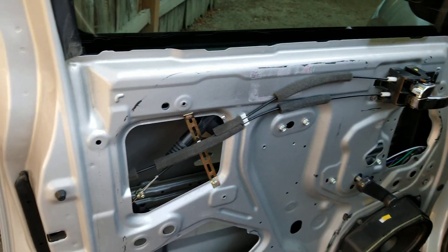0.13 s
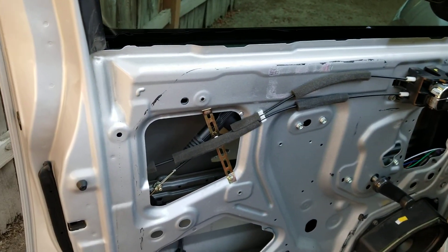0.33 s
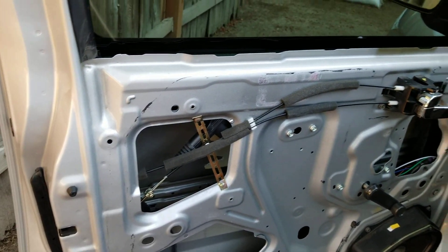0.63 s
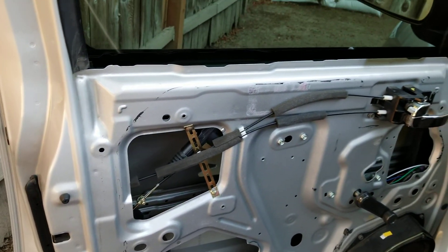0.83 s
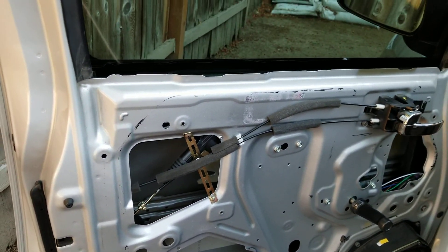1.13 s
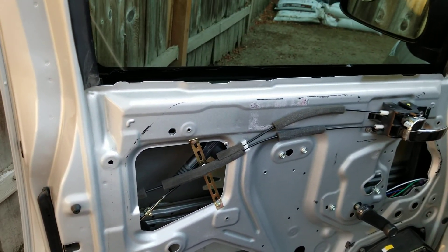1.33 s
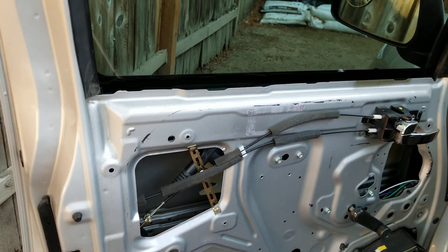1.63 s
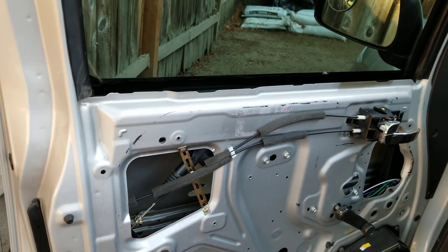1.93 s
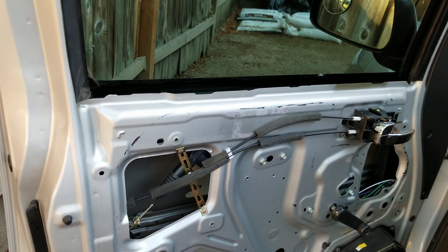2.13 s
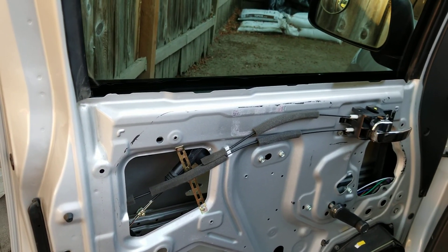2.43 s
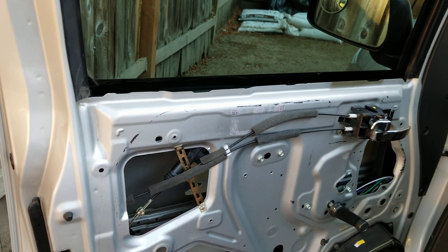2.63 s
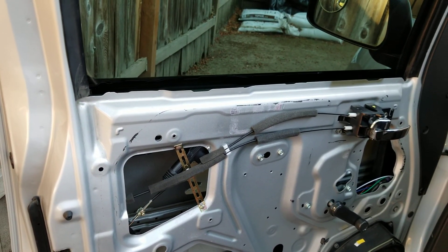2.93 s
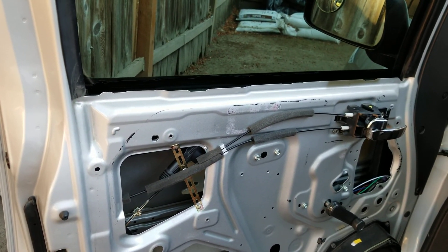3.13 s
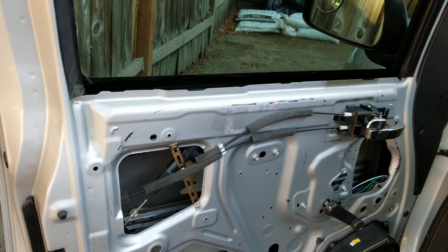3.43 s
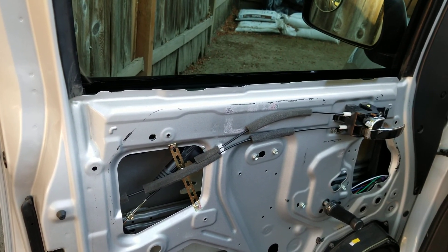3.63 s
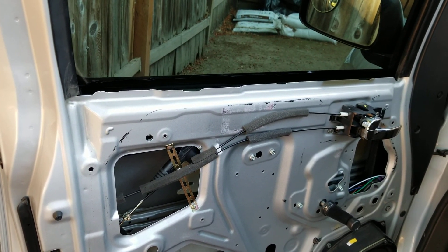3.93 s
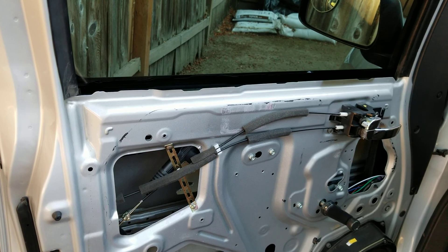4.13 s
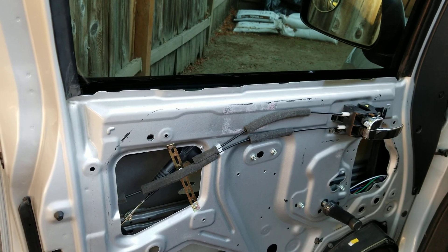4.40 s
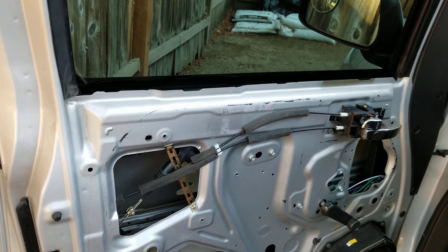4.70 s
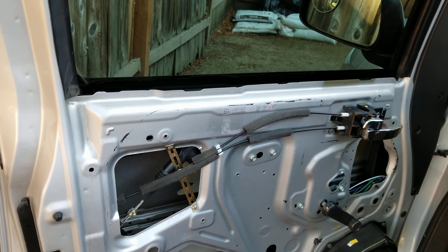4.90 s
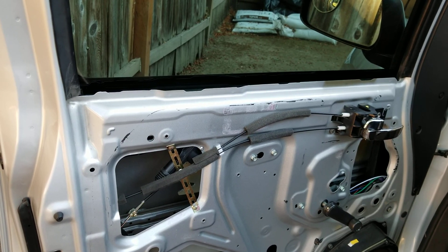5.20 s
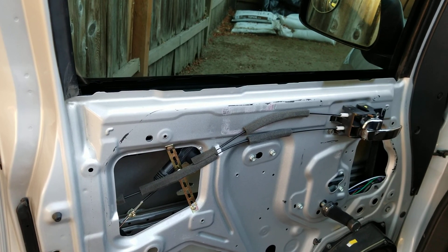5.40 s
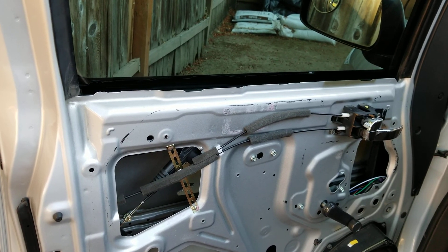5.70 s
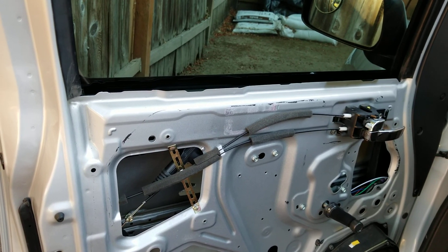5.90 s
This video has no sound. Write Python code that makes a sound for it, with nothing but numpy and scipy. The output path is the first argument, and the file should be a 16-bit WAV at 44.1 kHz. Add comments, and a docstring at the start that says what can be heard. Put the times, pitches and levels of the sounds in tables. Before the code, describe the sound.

A power lock actuator works at close range, louder toward the left. First press: tick, weak crunch, soft rubbing and knocks. Then lock, unlock, lock, unlock: sharp tick, a very short gear rattle, loud clack with booming sheet metal, and a much softer return click under half a second later. Distant rumble recedes; a hoarse far bird and thin whistles sound outside.

```python
"""A power lock works the latch of a stripped car door in an open garage; distant traffic, drone, birds, hiss.
First press: switch tick, a short crunch as the motor snatches at a closed stop, a rub and dull knocks.
Then lock and unlock: tick, gear teeth knock faster, the lever slams its stop, door modes boom; after each
powered spell a spring winds the gears back with a fainter clack. After the first unlock, a hoarse far bird;
then lock and unlock again. Contacts are decaying noise bands plus sine modes; traffic is fading noise."""
import sys
import numpy as np
from scipy import signal
from scipy.fft import rfft, irfft, next_fast_len
from scipy.io import wavfile
from scipy.ndimage import uniform_filter1d

SR = 44100
rng = np.random.default_rng(int(sys.argv[2]) if len(sys.argv) > 2 else 0)


def dump_mix(stems):
    """Bounce the given channels to the path in sys.argv[1] as a 16-bit WAV at rate SR."""
    frames = np.atleast_2d(stems).T  # one column per channel
    limited = np.clip(frames, -1, 1)  # hard clip at full scale
    pcm = np.round(limited * 32767).astype(np.int16)
    wavfile.write(sys.argv[1], SR, pcm)


N = 266893
TIME_S = np.arange(N) / SR
AGE_S = TIME_S[:SR]

# presses of the lock switch: t/s, wait until motor starts/s, snap level/dB, action of the lever
PRESSES = [(1.1229, .1446, -26.5, "stall"), (2.203, .1452, -22.5, "lock"), (3.274, .1456, -27.5, "unlock"),
           (4.3197, .1462, -22.5, "lock"), (5.3744, .1436, -28.5, "unlock")]
POWERED_S = .4255  # motor on-time, same for every press
# lever travel per action: powered run/s, free flight at its end/s
TRAVEL = {"lock": (.036, 0), "unlock": (.034, .006)}
# powered stroke per action: gear level/dB, stop level/dB, door mode level/dB
STROKE = {"lock": (-24.5, -21, -15.5), "unlock": (-27.5, -23.5, -15)}
# spring wind-back time per action: t/s
RETURN_S = {"lock": .03, "unlock": .0145, "stall": .015}
# spring return per action: gear level/dB, stop level/dB, shell level/dB, latch ring level/dB
RETURN = {"lock": (-36.5, -41.5, -27, -47.5), "unlock": (-39.5, -48.5, -34, -46),
          "stall": (-38, -49, -35, -40)}

# modes of door shell and latch: f/Hz, t60/s, locking level/dB, unlocking level/dB
DOOR = [(56, 0.65, -20, -22), (91, 0.5, -12, -16), (122, 0.4, -16, -21), (133, 0.3, -17, -16),
        (160, 0.4, -13, -21), (183, 0.33, -11, -16), (197, 0.33, -22, -16), (260, 0.3, -23, -17),
        (272, 0.33, -13, -38), (293, 0.28, -25, -19), (322, 0.28, -28, -18), (352, 0.28, -16, -24),
        (378, 0.28, -15, -27), (433, 0.24, -13, -29), (500, 0.2, -16, -38), (565, 0.17, -25, -23),
        (708, 0.19, -13, -23), (749, 0.17, -12, -21), (791, 0.14, -12, -23), (832, 0.15, -17, -15),
        (915, 0.12, -6, -5), (1071, 0.13, -14, -21), (1225, 0.11, -14, -20), (1310, 0.09, -11, -14),
        (1400, 0.08, -8, -8), (1463, 0.09, -12, -5), (1531, 0.14, -2, -11), (1720, 0.12, -10, -22),
        (1837, 0.11, -16, -11), (2514, 0.12, -18, -15)]
LATCH_HZ, LATCH_T60_S = 1520, 0.15
# modes of the rocker switch: f/Hz, t60/s, lock side level/dB, unlock side level/dB
ROCKER = [(1350, 0.0037, -7.5, -4.5), (2150, 0.0047, -18, -7), (3320, 0.0085, -14.5, -23),
          (4160, 0.01, -24, -10), (5030, 0.0061, -12.5, -16), (6420, 0.03, -50, -14.5),
          (7750, 0.015, -28, -7.5), (10300, 0.015, -33, -14.5), (13800, 0.0027, -7, -20),
          (15200, 0.0018, 2.5, -41)]
SWITCH_HOUSING_DB = -47.5

# contact colours, relative: f/Hz, level/dB per Hz
# lever on the locked, then the unlocked stop
LOCK_STOP = [(50, -16.5), (100, 3.5), (300, 4), (550, -10), (850, -0.5), (1550, -2), (2100, -3), (3200, -8),
             (4700, -6), (7200, -11.5), (9000, -21), (12000, -11), (16000, -12.5)]
UNLOCK_STOP = [(50, -27), (100, -3.5), (300, 0), (500, -12.5), (900, 1.5), (1150, -11), (1450, -2),
               (2300, -0.5), (3500, -5), (6500, -4), (8800, -17), (12500, -9), (16000, -14.5)]
# return spring shivering on after unlocking
COIL = [(200, -38), (1900, -21.5), (2600, 2.5), (3300, -18), (4900, -8), (6000, -18.5), (9000, -37)]
# softer second drop of the lever
REBOUND = [(50, -19), (100, -4.5), (300, -7), (550, -8.5), (850, 0), (1500, -1.5), (2200, -14),
           (5000, -18.5), (9000, -30.5), (16000, -31)]
# gears running to the locked, then the unlocked stop
GEARS = [(50, -17), (130, 7.5), (400, -1), (900, -1.5), (1600, -3.5), (3000, -4.5), (5000, -9.5),
         (7300, -9.5), (9000, -22), (12000, -13), (16000, -19)]
UNLOCK_GEARS = [(50, -20.5), (130, 6), (400, -4.5), (900, -12), (1600, 2), (3000, -4), (5000, -4.5),
                (7300, -14.5), (9000, -23), (12000, -14.5), (16000, -24)]
# gears snatching against a closed stop
STALL = [(60, -10), (200, 8), (500, -0.5), (900, 3), (1600, -1.5), (3000, -2.5), (4500, -5.5), (7500, -3.5),
         (9000, -13), (12000, -6.5), (16000, -6.5)]
# gears spun back by the spring, then meeting the latch
SPRING = [(60, -17.5), (180, -1), (360, 2), (520, -10.5), (800, -2.5), (1200, -11.5), (1600, -8.5),
          (2700, -15), (5000, -19), (6800, -17.5), (8700, -33.5), (12000, -24), (16000, -30)]
SPRING_STOP = [(60, -14), (170, -2), (400, -2.5), (800, -6.5), (1600, -6.5), (3000, -8.5), (6000, -15.5),
               (8600, -21.5), (9600, -13.5), (11000, -20), (16000, -21.5)]
# switch housing
SWITCH = [(200, -25), (700, -3.5), (1500, -4), (2300, -7), (2900, -17), (4200, -4.5), (5000, -7.5),
          (7400, -4), (9200, -18), (12000, -3.5), (15500, 3.5)]
# dull knock on the door
THUD = [(40, -8), (90, 0), (220, -1), (450, -21), (1500, -27), (8000, -53)]

# dense panel modes, before each contact's ring factor: f/Hz, t60/s
PANEL_T60 = [(60, 0.27), (200, .36), (500, 0.22), (1000, 0.16), (2000, 0.13), (5000, 0.12), (10000, 0.073),
             (16000, 0.047)]
# garage reverberation relative to the panel ring: f/Hz, level/dB
GARAGE = [(60, -19), (200, -26.5), (600, -31.5), (1500, -39.5), (5000, -41), (10000, -43), (16000, -42.5)]
GARAGE_T60_S = 0.7

# knocks on the door: t/s, level/dB
KNOCKS = [(1.282, -38), (1.311, -40.5), (1.344, -45.5), (1.386, -51), (1.401, -44.5)]
# rubs on the door: t/s, attack/s, level/dB
RUBS = [(.85, .055, -62), (1.335, .024, -52)]
# rubbing colour, relative: f/Hz, level/dB per Hz
RUBBING = [(200, -5), (1000, -2), (2500, -8), (7000, -5), (9000, -10.5), (16000, -6)]
RUB_SLOWING_S, RUB_FADE_POWER = .05, 1.45

# bird calls: t/s, length/s, f/Hz, level/dB
CALLS = [(.465, 0.079, 7290, -69), (.5, .09, 7640, -68), (2.53, 0.071, 7560, -70), (3.11, 0.055, 7700, -56),
         (3.388, 0.045, 7400, -70), (5.425, .05, 7800, -67.5), (5.463, .03, 7170, -69.5),
         (5.665, .04, 7100, -63)]
# bands of the hoarse call: f/Hz, width/Hz, level/dB
RASP_BANDS = [(3500, 330, -9), (4880, 480, 0), (6800, 670, -5)]
RASP_AT_S, RASP_ATTACK_S, RASP_T60_S, RASP_DB = 3.865, .025, .64, -63.5

# background colours, relative: f/Hz, level/dB per Hz
# traffic rumble, then tyre wash, then microphone hiss
RUMBLE = [(12, -60.5), (20, -38.5), (29, -16), (35, -13), (59, -5.5), (81, 0), (97, -1.5), (125, -4.5),
          (157, -25), (200, -16), (260, -47.5), (440, -120)]
WASH = [(110, -29), (180, -1.5), (286, -3.5), (316, -7.5), (379, -3.5), (498, -14.5), (875, -8),
        (1210, -19), (1490, -34.5), (2000, -32.5), (2600, -66.5), (4400, -120)]
HISS = [(1500, -5.5), (1800, -14), (2300, -3.5), (2800, -12.5), (4000, -13), (5400, -15), (6400, -9.5),
        (7600, -6), (8400, -22.5), (9600, -22), (11000, -10.5), (12500, -7), (14000, 1.5), (16000, -9)]
RUMBLE_START_DB, RUMBLE_FADE_DB_PER_S = -50, .5
WASH_START_DB, WASH_FADE_DB_PER_S = -59.5, 1.22
DIP_AT_S, DIP_WIDTH_S, DIP_DB = 1.91, 0.06, 14  # the rumble dips briefly
DRONE_AT_S, DRONE_WIDTH_S, DRONE_PEAK_DB = .75, 0.27, -61.5
HISS_DB = -69

# likeness of the two microphones, door then air: f/Hz, likeness/1
DOOR_LIKENESS = [(60, .97), (130, .97), (290, .88), (640, .78), (1410, .45), (3100, .05), (16000, .03)]
AIR_LIKENESS = [(60, 1), (130, 0.83), (290, 0.86), (640, 0), (16000, 0.19)]
# left minus right, door then air: f/Hz, level/dB
DOOR_BALANCE = [(60, 1.2), (200, 2.5), (380, 3.3), (700, 2.8), (1290, 6.8), (2400, 5), (4400, 7), (8100, 8),
                (15000, 11.5)]
AIR_BALANCE = [(60, 2.5), (120, 3.5), (240, 5.5), (480, 6.5), (950, 7.0), (1890, 0.5), (3770, 2.5),
               (7520, 10), (15000, 9.0)]
CUTOFF_HZ = 16100


def actuator(rebound_db=-7, rebound_s=.013, coil_db=-35):
    """The motor drives the lever into one of two stops; each stop excites the door modes differently."""
    out = np.zeros((2, N))
    lock_stop = panel(LOCK_STOP, ring=0.84, build_cycles=5.0)
    unlock_stop = panel(UNLOCK_STOP, ring=0.96, build_cycles=5.0)
    unlock_stop = unlock_stop + from_db(coil_db) * panel(COIL, ring=4.8, build_cycles=5.0)
    stops = [lock_stop, unlock_stop]
    rebound = panel(REBOUND, ring=0.54, build_cycles=0.86)
    booms = [sum(from_db(levels[way]) * mode(hz, t60_s) for hz, t60_s, *levels in DOOR)
             for way in range(2)]
    gears = [panel(GEARS, ring=0.69, build_cycles=0.66), panel(UNLOCK_GEARS, ring=0.93, build_cycles=1.1)]
    for way, action in enumerate(STROKE):
        # when unlocking, the lever flies free for the last few milliseconds
        run_s, free_s = TRAVEL[action]
        gear_db, stop_db, modes_db = STROKE[action]
        for start_s in motor_starts(action):
            run = gear_run(gears[way], run_s - free_s, teeth_hz=908.2, rise_db=14,
                           spin_up_s=.012, uneven_db=4.0)
            slam_s = start_s + run_s
            add(out, start_s, from_db(gear_db) * run)
            add(out, slam_s, from_db(stop_db) * stops[way] + from_db(modes_db) * booms[way])
            add(out, slam_s + rebound_s, from_db(stop_db + rebound_db) * rebound)
    return out


def stall(length_s=0.01, level_db=-34):
    """With the lever already at its stop, the motor only snatches up the slack: a short, bright crunch."""
    out = np.zeros((2, N))
    gears = panel(STALL, ring=0.91, build_cycles=4.0)
    crunch = gear_run(gears, length_s, teeth_hz=1100, rise_db=0, spin_up_s=.001, uneven_db=1.5)
    for start_s in motor_starts("stall"):
        add(out, start_s, from_db(level_db) * crunch)
    return out


def spring_return(soft_hz=600, take_up_s=.010):
    """The spring spins the gears back, nudging the shell as slack is taken up, until they meet the latch."""
    out = np.zeros((2, N))
    gears = panel(SPRING, ring=0.86, build_cycles=0.82)
    rest = panel(SPRING_STOP, ring=.95, build_cycles=2.5)
    latch = mode(LATCH_HZ, LATCH_T60_S)
    # a soft push reaches mostly the low modes
    shell = sum(from_db(db) * mode(hz, t60_s) / (1 + (hz / soft_hz) ** 2)
                for hz, t60_s, db, _ in DOOR[2:])
    for pressed_s, wait_s, _, action in PRESSES:
        run_s = RETURN_S[action]
        gear_db, stop_db, shell_db, latch_db = RETURN[action]
        release_s = pressed_s + wait_s + POWERED_S
        run = gear_run(gears, run_s, teeth_hz=1098.7, rise_db=13.5, spin_up_s=.008, uneven_db=3.0)
        add(out, release_s, from_db(gear_db) * run)
        add(out, release_s + take_up_s, from_db(shell_db) * shell)
        add(out, release_s + run_s, from_db(stop_db) * rest + from_db(latch_db) * latch)
    return out


def motor_starts(action):
    """Motor start times/s for one kind of action."""
    return [pressed_s + wait_s for pressed_s, wait_s, _, does in PRESSES if does == action]


def gear_run(body, length_s, teeth_hz, rise_db, spin_up_s, uneven_db):
    """Teeth knock faster and harder as the gears gain speed; rms 1 around the end of the run."""
    t = AGE_S[:int(length_s * SR)]
    speed = 1 - np.exp(-t / spin_up_s)
    turned_teeth = np.cumsum(speed) * teeth_hz / SR
    mesh = np.flatnonzero(np.diff(np.floor(turned_teeth), prepend=-1))
    # each tooth meets a little early or late, with its own force, on either flank
    slack, force, flank = rng.standard_normal((3, 200))[:, :len(mesh)]
    at = np.clip(mesh + slack * .25 * SR / teeth_hz, 0, len(t) - 1).astype(int)
    knock_db = rise_db * (speed[mesh] - 1) + uneven_db * force
    knocks = np.zeros((1, len(t)))
    knocks[0, at] = from_db(knock_db) * np.sign(flank)
    run = signal.fftconvolve(body, knocks, axes=1)
    run_end = run[:, len(t) * 3 // 4:len(t) * 5 // 4]
    return run / np.sqrt(np.mean(run_end ** 2))


def panel(spectrum, ring, build_cycles):
    """Dense door modes and garage as decaying noise bands for one contact; rms 1 over the first 20 ms."""
    out, edges_hz = 0, np.geomspace(40, 17500, 31)
    white = rng.standard_normal((2, 2, 2 * SR))
    for k, (low, high) in enumerate(zip(edges_hz, edges_hz[1:])):
        hz = np.sqrt(low * high)
        band = signal.butter(2, [low, high], "band", fs=SR, output="sos")
        # neighbouring bands use separate noise; the first second lets the filter settle
        mid, side = signal.sosfilt(band, white[k % 2])[:, SR:]
        # bending waves are slow in the bass, so the lows build up later
        swell = 1 - np.exp(-AGE_S * hz / build_cycles)
        panel_decay = from_db(-60 * AGE_S / (ring * at_hz(PANEL_T60, hz)))
        garage_decay = from_db(at_hz(GARAGE, hz) - 60 * AGE_S / GARAGE_T60_S)
        envelope = swell * (panel_decay + garage_decay)
        both = stereo(rms_one(mid * envelope), rms_one(side * envelope),
                      at_hz(DOOR_LIKENESS, hz), at_hz(DOOR_BALANCE, hz))
        out = out + both * from_db(at_hz(spectrum, hz)) * np.sqrt(high - low)
    return out / np.sqrt(np.mean(out[:, :SR // 50] ** 2))


def mode(hz, t60_s, build_cycles=0.97):
    """One mode swells over a few cycles and dies away; high modes reach the microphones out of step."""
    apart_rad = np.arccos(np.clip(at_hz(DOOR_LIKENESS, hz), -1, 1)) * rng.choice([-1, 1])
    phase_rad = 2 * np.pi * (hz * AGE_S + rng.random()) + np.array([[0], [apart_rad]])
    swell = 1 - np.exp(-AGE_S * hz / build_cycles)
    decay = from_db(-60 * AGE_S / t60_s)
    return np.sin(phase_rad) * swell * decay * pan(at_hz(DOOR_BALANCE, hz))


def switch():
    """The rocker snaps over with a sharp ring of its own on each side; its housing answers briefly."""
    out = np.zeros((2, N))
    for pressed_s, _, snap_db, action in PRESSES:
        side = int(action != "lock")
        snap = sum(from_db(levels[side]) * mode(hz, t60_s, build_cycles=0.89)
                   for hz, t60_s, *levels in ROCKER)
        housing = panel(SWITCH, ring=0.84, build_cycles=0.38)
        add(out, pressed_s, from_db(snap_db) * snap + from_db(SWITCH_HOUSING_DB) * housing)
    return out


def handling():
    """Friction noise that slows and fades for rubs; short, dull panel answers for knocks."""
    out, friction = np.zeros((2, N)), air_noise(RUBBING)
    for start_s, attack_s, db in RUBS:
        onset, age_s = rise(start_s, attack_s)
        fade = (1 + age_s / RUB_SLOWING_S) ** RUB_FADE_POWER
        out += from_db(db) * onset ** 2 / fade * friction
    thud = panel(THUD, ring=0.25, build_cycles=0.38)
    for start_s, db in KNOCKS:
        add(out, start_s, from_db(db) * thud)
    return out


def bird(scoop_hz=450, scoop_s=0.0068, waver_hz=45, echo_db=-3.5, echo_t60_s=.55, left_db=13,
         swell_power=0.45):
    """Thin, wavering whistles slide up to their pitch and scatter off fence and walls."""
    out = np.zeros((2, N))
    yard = rms_one(rng.standard_normal((2, SR)) * from_db(-60 * AGE_S / echo_t60_s)) / np.sqrt(SR)
    for start_s, length_s, hz, db in CALLS:
        t = AGE_S[:int(length_s * SR)]
        waver = rms_one(uniform_filter1d(rng.standard_normal(SR), size=40))[:len(t)]
        pitch_hz = hz - scoop_hz * np.exp(-t / scoop_s) + waver_hz * waver
        swell = np.sin(np.pi * (t / length_s) ** swell_power)
        whistle = np.sin(2 * np.pi * np.cumsum(pitch_hz) / SR)
        call = from_db(db) * swell * whistle * pan(left_db)
        add(out, start_s, call)
        add(out, start_s, from_db(echo_db) * signal.fftconvolve(call, yard, axes=1))
    return out


def far_bird(left_db=4):
    """A hoarse call, smeared by distance into three bands of hiss."""
    call = sum(from_db(db) * hiss_band(hz, width_hz) for hz, width_hz, db in RASP_BANDS)
    onset, age_s = rise(RASP_AT_S, RASP_ATTACK_S)
    return onset * from_db(RASP_DB - 60 * age_s / RASP_T60_S) * rms_one(call) * pan(left_db)


def background():
    """Coloured noise: rumble and wash of receding traffic, a far engine's single swell, microphone hiss."""
    dip_db = DIP_DB * np.exp(-((TIME_S - DIP_AT_S) / DIP_WIDTH_S) ** 2)
    rumble_db = RUMBLE_START_DB - RUMBLE_FADE_DB_PER_S * TIME_S - dip_db
    rumble = from_db(rumble_db) * air_noise(RUMBLE)
    wash = from_db(WASH_START_DB - WASH_FADE_DB_PER_S * TIME_S) * air_noise(WASH)
    swell = 1 / (1 + ((TIME_S - DRONE_AT_S) / DRONE_WIDTH_S) ** 2)
    drone = hiss_band(hz=383, width_hz=51) * pan(at_hz(AIR_BALANCE, 380))
    engine = from_db(DRONE_PEAK_DB) * swell * drone
    return rumble + wash + engine + from_db(HISS_DB) * air_noise(HISS)


def air_noise(spectrum):
    """Steady diffuse noise of a given colour, rms 1."""
    size = next_fast_len(N, True)
    hz = np.maximum(np.fft.rfftfreq(size, 1 / SR), 1)
    mid, side = rfft(rng.standard_normal((2, size)))
    both = stereo(mid, side, at_hz(AIR_LIKENESS, hz), at_hz(AIR_BALANCE, hz))
    return rms_one(irfft(both * from_db(at_hz(spectrum, hz)))[:, :N])


def hiss_band(hz, width_hz):
    """A narrow band of stereo noise, rms 1."""
    band = signal.butter(2, [hz - width_hz / 2, hz + width_hz / 2], "band", fs=SR, output="sos")
    return rms_one(signal.sosfilt(band, rng.standard_normal((2, N))))


def rise(start_s, attack_s):
    """A ramp from 0 to 1 from start_s, and the seconds since its top."""
    return np.clip((TIME_S - start_s) / attack_s, 0, 1), np.maximum(TIME_S - start_s - attack_s, 0)


def stereo(mid, side, likeness, left_db):
    """Two unrelated noises become a left and right of given likeness and balance."""
    alike = np.clip(likeness, -.99, .99)
    both = np.sqrt(1 + alike) * mid + np.sqrt(1 - alike) * side * [[1], [-1]]
    return both * pan(left_db)


def pan(left_db):
    """Channel gains for a level difference, at constant total power."""
    gains = from_db(np.array([[.5], [-.5]]) * left_db)
    return gains / np.sqrt(np.cosh(left_db * np.log(10) / 20))


def from_db(db):
    """Decibels to gain."""
    return 10 ** (np.asarray(db) / 20)


def rms_one(x):
    """Scale to an rms of one."""
    return x / np.sqrt(np.mean(x ** 2) + 1e-20)


def at_hz(points, hz):
    """Read a table on a log-frequency axis."""
    table_hz, values = np.array(points).T
    return np.interp(np.log(hz), np.log(table_hz), values)


def add(out, start_s, sound):
    """Mix a sound in from start_s."""
    start = int(round(start_s * SR))
    out[:, start:start + sound.shape[1]] += sound[:, :N - start]


def scene():
    """The lock at work in front of the quiet yard."""
    lock = actuator() + stall() + spring_return() + switch()
    return lock + handling() + bird() + far_bird() + background()


def record(dry, dull_hz=17000):
    """The microphones lose a little treble; the top is cut steeply."""
    heard = signal.sosfilt(signal.butter(1, min(dull_hz, .45 * SR), fs=SR, output="sos"), dry)
    return signal.sosfilt(signal.ellip(10, .2, 80, CUTOFF_HZ, fs=SR, output="sos"), heard)


dry = scene()
out = record(dry)
dump_mix(out)
```